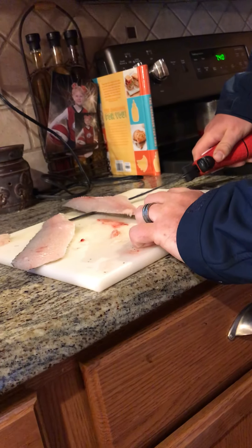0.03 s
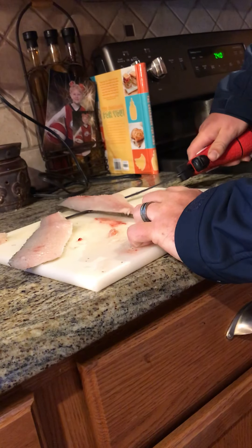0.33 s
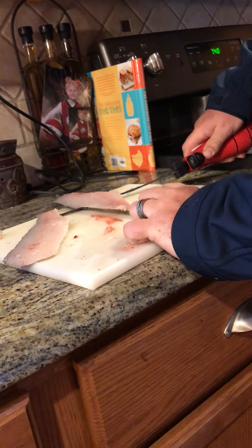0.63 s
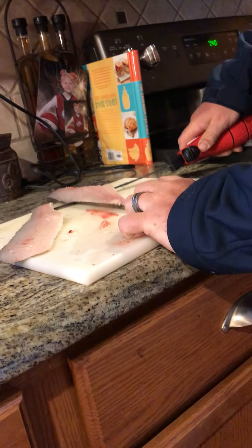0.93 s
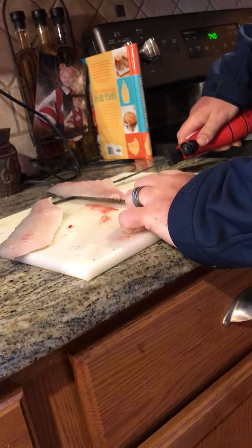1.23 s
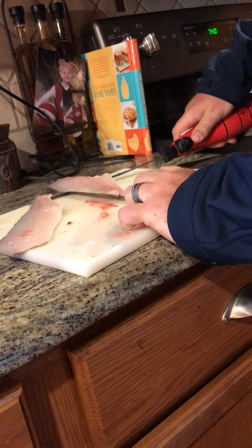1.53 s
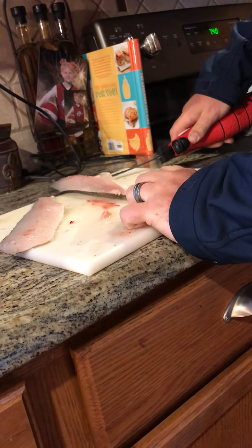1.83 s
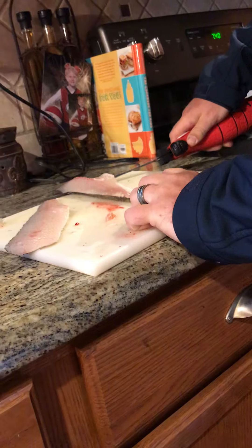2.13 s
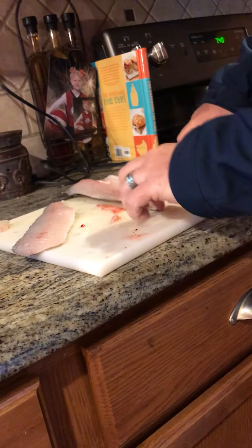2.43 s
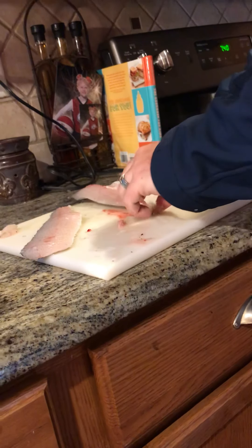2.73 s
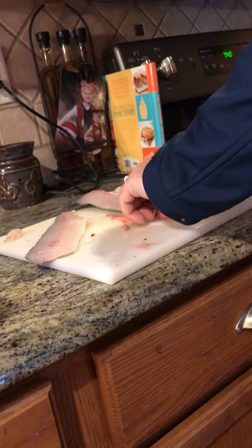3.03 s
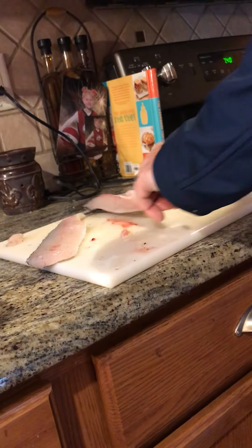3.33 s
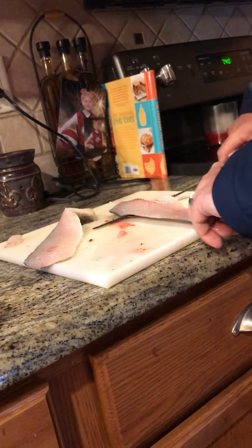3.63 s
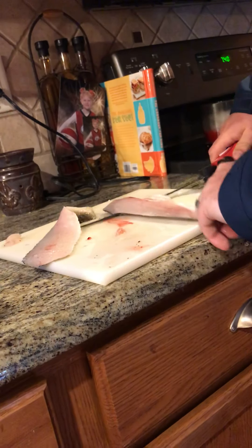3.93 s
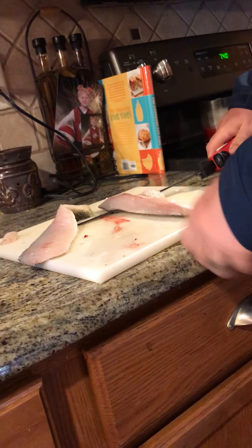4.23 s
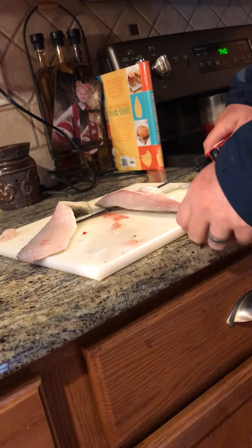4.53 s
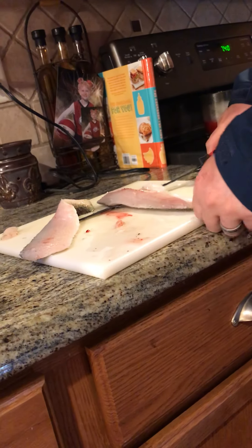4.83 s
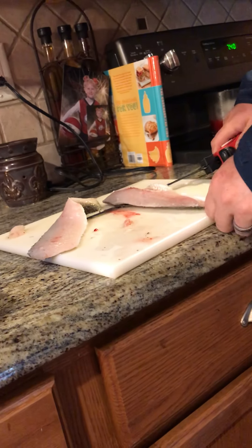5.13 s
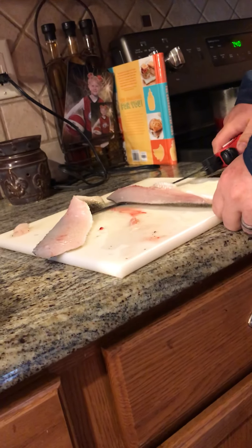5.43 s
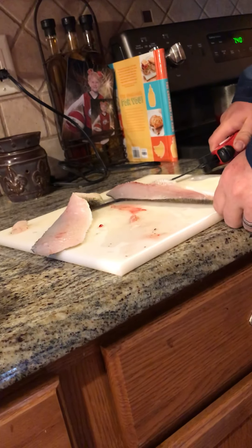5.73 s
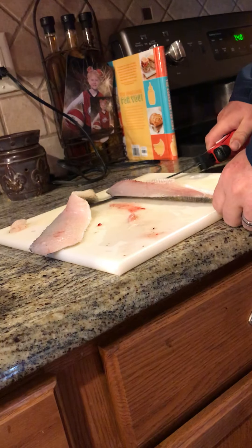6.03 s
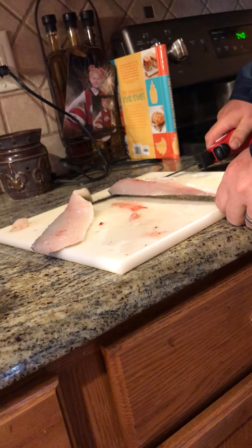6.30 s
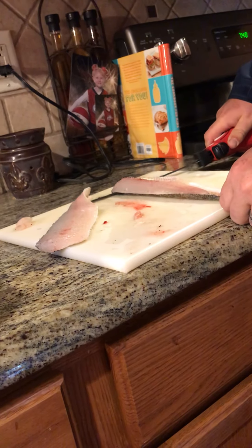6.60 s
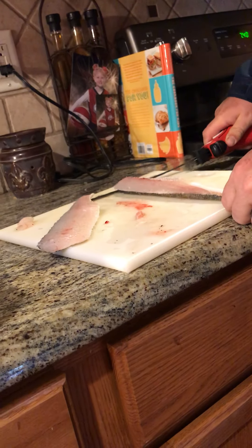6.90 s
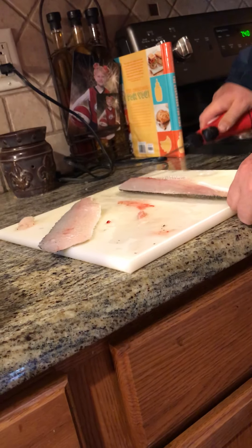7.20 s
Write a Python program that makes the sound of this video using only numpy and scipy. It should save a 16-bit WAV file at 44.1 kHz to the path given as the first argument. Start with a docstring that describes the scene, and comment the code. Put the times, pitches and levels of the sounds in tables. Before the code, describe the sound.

An electric knife saws through fish on a cutting board with a fast, chattering buzz, then coasts down. In the lull a hand thuds softly on the board and a sleeve brushes past. The knife gives a short, clattering burst, slows again, then restarts for a longer cut with a thin whine. Its blades click sharply as it begins to wind down. It is heard close by in a small kitchen with a faint hum.

```python
"""An electric fillet knife saws through a fish on a board, coasts down twice and starts again.
Its rotor turns a crank through a gear: gears and blades chatter on both strokes, and unloaded
blades slap at reversal. The trigger is let go once more just before the end.
The wiping hand thuds on the board and a sleeve brushes past in the first pause.
A small kitchen with a mains hum surrounds it."""
import sys
import numpy as np
from scipy import signal
from scipy.fft import rfft, irfft
from scipy.io import wavfile
from scipy.ndimage import uniform_filter1d

SR = 44100
rng = np.random.default_rng(int(sys.argv[2]) if len(sys.argv) > 2 else 0)


def wav_record(signal):
    """Record a signal, one row per channel, as 16-bit PCM in the file named by sys.argv[1]."""
    frames = np.transpose(np.atleast_2d(signal))
    bounded = np.clip(frames, -1, 1)
    # unit amplitude maps onto the largest positive 16-bit level
    quanta = np.round(bounded * 32767).astype(np.int16)
    wavfile.write(sys.argv[1], SR, quanta)


N = 328986
TIME_S = np.arange(N) / SR
FREQ_HZ = np.fft.rfftfreq(4096, 1 / SR) + 1

# Each row: trigger pulled in seconds, let go in seconds, friction braking in Hz per second.
TRIGGER_PULLS = [(-1, 2.237, 17.27), (3.68, 4.235, 21.39), (5.17, 7.232, 14.8)]
# Crank speed held under power. Each row: time in seconds, speed in Hz.
DRIVE_SPEED = [(0, 31.49), (1.1, 31.91), (2.05, 32.05), (2.27, 33.27), (3.68, 29.77), (4.2, 33.1),
               (5.17, 27.88), (5.55, 32.37), (6.1, 32.0), (6.7, 32.16), (7.2, 33.3)]
# Free blades at full speed, one row per pull. Each row: gear, rasp, slap, rotor and tip levels in dB,
# share of the blades lying flat from 0 to 1, extra chatter at the start in dB.
RUN_LEVELS = [(-35.5, -34, -23, -50, -48, 0.09, 0), (-34, -34.5, -25, -48.5, -45, .92, -2),
              (-37, -34.5, -25, -50, -37, 0.2, 2.5)]
# Cuts through the fish. Each row: entry in seconds, start of exit in seconds, then gains in dB for
# gear at head, gear at tail, whine at head, whine at tail, tips.
FISH_CUTS = [(-.5, 2.12, -4.5, -1, 6, 5, -5), (5.22, 6.79, 0, -1.5, 7, 13.5, -26)]
# Blades bearing on the board, most as the last cut ends. Each row: time in seconds, level in dB.
BOARD_LOAD = [(0, -49), (6.7, -45), (6.88, -35.5), (7.08, -33.5), (7.25, -47), (7.46, -58)]
# Blades snagging on each other or on skin. Each row: start in seconds, level in dB.
SNAGS = [(3.276, -36), (7.012, -27), (7.044, -30), (7.059, -46), (7.089, -34), (7.134, -26)]
# Stroke drumming on the board. Each row: multiple of the crank speed, level in dB.
STROKE_HARMONICS = [(4, -63.5), (6, -72), (11, -61), (12, -62), (13, -62), (14, -70.5), (16, -58.5),
                    (18, -63), (26, -49.5), (27, -49), (28, -47.5), (29, -48.5), (30, -49.5), (32, -56),
                    (34, -54)]
# Kitchen air. Each row: frequency in Hz, relative spectral density in dB.
AIR_SPECTRUM = [(25, -15), (42, -1), (70, 9.5), (110, -1.5), (250, 1.5), (500, -3), (1000, -26),
                (2000, -57), (5000, -12), (16000, -19)]
# Hand on the board; dull knocks heard through the handle: late strokes of the coasting blades and the trigger.
# Each row: start in seconds, level in dB.
HAND_THUDS = [(2.503, -41)]
HANDLE_KNOCKS = [(3.347, -41.5), (3.436, -40), (3.659, -37), (5.122, -41)]
# Passing sleeve. Each row: time in seconds, weave rate in Hz, level in dB.
SLEEVE_SWEEP = [(3.45, 1300, -57), (3.478, 1408, -53), (3.49, 1458, -41.5), (3.51, 1533, -41.5),
                (3.545, 1540, -39), (3.57, 1440, -42), (3.6, 1320, -45), (3.64, 1270, -68)]

# Resonances. Each row: frequency in Hz, width in Hz, relative level in dB.
LOADED_KNIFE_MODES = [(497, 270, -10.5), (680, 100, -15), (803, 460, 0), (1077, 103, 3.5), (1456, 82, 2.5),
                      (1630, 110, 1), (1910, 390, -3.5), (2320, 250, 2), (2560, 190, 1.5), (2980, 350, 2),
                      (3710, 420, 0.5), (4230, 800, -0.5), (5270, 120, -1), (6350, 1430, -2.5),
                      (8640, 450, -4), (9700, 440, -7.5), (11600, 950, -13.5), (14200, 2500, -31)]
FREE_KNIFE_MODES = [(345, 320, -7), (610, 110, -11), (820, 250, 1.5), (1090, 130, 5), (1480, 87, -1),
                    (1690, 150, -2.5), (2404, 320, -3), (3220, 590, 6), (4120, 590, 5.5),
                    (6500, 1200, -2.5), (8400, 500, -2), (11500, 3700, -23.5)]
CUTTING_BOARD_MODES = [(650, 37, -2.5), (868, 107, 0), (1030, 74, -19)]
LIFTED_BLADE_MODES = [(1000, 220, 2), (2590, 100, 5.5), (3505, 250, 7.5), (4440, 520, -3), (5390, 95, 7.5),
                      (6070, 270, 0.5), (6910, 420, 3), (8300, 350, 0.5), (9050, 1200, -11),
                      (10660, 360, -3), (11900, 350, -5), (13000, 400, -2), (14500, 1800, -29)]
FLAT_BLADE_MODES = [(1470, 300, 3), (3580, 300, 2.5), (5950, 230, 5.5), (6920, 240, 0), (8100, 48, 12),
                    (8700, 250, -8), (9410, 460, 4.5), (11000, 240, -2), (12100, 400, -19),
                    (13100, 800, -7), (15300, 1400, -15)]
DAMPED_BLADE_MODES = [(3140, 410, 7), (4130, 760, 3.5), (6160, 1400, 1), (8850, 2300, -2),
                      (12600, 2300, -9)]
BLADE_TIP_MODES = [(13100, 310, 0)]
HANDLE_MODES = [(745, 150, -1), (1040, 170, 0.5), (2600, 500, -16), (3800, 1700, -13), (9000, 11000, -23)]


def undb(db):
    """Decibels to gain."""
    return 10 ** (np.asarray(db) / 20)


def unit(x):
    """Scale to rms 1."""
    return x / np.sqrt(np.mean(x ** 2))


def curve(rows, column=1):
    """One table column, interpolated over time."""
    rows = np.asarray(rows, float)
    return np.interp(TIME_S, rows[:, 0], rows[:, column])


def ramp(start_s, length_s):
    """Linear rise from 0 to 1."""
    return np.clip((TIME_S - start_s) / length_s, 0, 1)


def walk(rate_hz):
    """Random drift, rms 1."""
    levels = rng.standard_normal(int(TIME_S[-1] * rate_hz) + 2)
    return unit(np.interp(TIME_S * rate_hz, np.arange(len(levels)), levels))


def grit(spread_db):
    """Dense tiny impacts of uneven size."""
    return unit(rng.standard_normal(N) * undb(spread_db * rng.standard_normal(N)))


def body(modes, low_hz=0, high_hz=np.inf):
    """Gain of a set of resonances, scaled so unit white noise has rms 1 in the band."""
    power = sum(undb(db) ** 2 / (1 + ((FREQ_HZ ** 2 - hz ** 2) / (FREQ_HZ * width_hz)) ** 2)
                for hz, width_hz, db in modes)
    return np.sqrt(power / np.mean(power * (FREQ_HZ > low_hz) * (FREQ_HZ < high_hz)))


def ring(x, gain):
    """Minimum-phase filter with this gain over FREQ_HZ."""
    cepstrum = irfft(np.log(gain + 1e-9))
    half = len(cepstrum) // 2
    cepstrum[1:half] *= 2
    cepstrum[half + 1:] = 0
    return signal.oaconvolve(x, irfft(np.exp(rfft(cepstrum))))[:N]


def clicks(times_s, sizes):
    """Impulses at the given times."""
    return np.bincount(np.clip(times_s * SR, 0, N).astype(int).ravel(), sizes.ravel(), N + 1)[:N]


def blows(rows, decay_s):
    """A sudden, decaying envelope per row."""
    times_s, db = np.transpose(rows)
    return signal.oaconvolve(clicks(times_s, undb(db)), np.exp(-TIME_S[:SR // 10] / decay_s))[:N]


def lobe(turns, centre_turns, width_turns):
    """One smooth swell per crank turn."""
    return np.exp((np.cos(2 * np.pi * (turns - centre_turns)) - 1) / (2 * np.pi * width_turns) ** 2)


def crank(spin_up_s=0.025, drag_per_s=0.25):
    """Crank speed: the motor spins up, then coasts against drag and friction when let go."""
    speed_hz = np.zeros(N)
    for pulled_s, let_go_s, braking_hz_per_s in TRIGGER_PULLS:
        coast_s = np.maximum(TIME_S - let_go_s, 0)
        spin_up = 1 - np.exp(-np.maximum(TIME_S - pulled_s, 0) / spin_up_s)
        driven_hz = np.interp(TIME_S - coast_s, TIME_S, curve(DRIVE_SPEED)) * spin_up
        run_hz = driven_hz * np.exp(-drag_per_s * coast_s) - braking_hz_per_s * coast_s
        speed_hz = np.maximum(speed_hz, run_hz)
    return speed_hz


def flesh(enter_s=0.37, leave_s=0.21):
    """Blade depth in the fish from 0 to 1, and the dB it adds to gear, whine and tips."""
    total = 0
    for entry_s, exit_s, *ends_db, tips_db in FISH_CUTS:
        depth = ramp(entry_s, enter_s) * (1 - ramp(exit_s, leave_s))
        gear_db = np.interp(TIME_S, [entry_s, exit_s], ends_db[:2])
        whine_db = np.interp(TIME_S, [entry_s, exit_s], ends_db[2:])
        total += np.array([depth, depth * gear_db, depth * whine_db, depth * tips_db])
    return total


def efforts(speed_hz, full_hz=33, slap_from_hz=6.3, free_bite=0.65):
    """Blade load (bite), flat share and part gains from speed, trigger, fish and board."""
    pace = speed_hz / full_hz
    run = np.searchsorted([row[0] for row in TRIGGER_PULLS], TIME_S) - 1
    pulled_s, let_go_s, _ = np.array(TRIGGER_PULLS)[run].T
    gear_db, rasp_db, slap_db, rotor_db, tips_db, flat, start_db = np.array(RUN_LEVELS)[run].T
    settling_db = start_db * (1 - ramp(pulled_s, 0.4))
    jolt_db = 11 * np.exp(-(TIME_S - pulled_s) / 0.024)  # starting torque jerks the gears
    depth, cut_gear_db, cut_whine_db, cut_tips_db = flesh()
    damping = 1 - depth + depth * undb(-11.5)  # flesh damps the blades
    # Bearing on the board hardens the push and stifles whine and tips.
    pressing_db = np.maximum(curve(BOARD_LOAD) - BOARD_LOAD[1][1], 0)
    play = np.clip((speed_hz - slap_from_hz) / 1.9, 0, 1)
    play *= undb(-4 * (1 - ramp(let_go_s, 0.29)))  # the driving motor takes up some play
    return dict(
        bite=np.clip((free_bite + (1 - free_bite) * depth) * pace ** 2.3, 0, 1),
        gear=undb(gear_db + cut_gear_db + jolt_db + settling_db) * pace ** 0.93,
        rasp=undb(rasp_db - 0.5 * depth + settling_db) * pace ** 1.3 * ramp(pulled_s, 0.01),
        slap=undb(slap_db) * damping * play * pace ** 1.13 * ramp(pulled_s, 0.16),
        flat=np.clip(flat + (0.88 - flat) * depth, 0, 1),
        rotor=undb(rotor_db) * pace ** 4.3 * ramp(pulled_s, 0.16),
        crunch=undb(0.4 * pressing_db),
        whine=undb(-53.5 + cut_whine_db - 1.6 * pressing_db) * pace ** 2.5,
        tips=undb(tips_db + cut_tips_db - 0.7 * pressing_db) * pace ** 2 * ramp(pulled_s, 0.56) ** 2)


def contacts(turns, speed_hz, jitter_s=3e-5, scatter_db=4, wander_db=1.5, per_turn=240):
    """The same teeth and burrs touch every turn; the force wanders as the hand moves."""
    offsets = (np.arange(per_turn) + rng.random(per_turn)) / per_turn
    places = np.arange(np.floor(turns[0]), turns[-1])[:, None] + offsets
    wander = unit(uniform_filter1d(rng.standard_normal(places.shape), size=24, axis=0))
    signs = rng.choice([-1, 1], per_turn)
    sizes = signs * undb(wander_db * wander + scatter_db * rng.standard_normal(places.shape))
    times_s = np.interp(places, turns, TIME_S, left=np.inf, right=np.inf)
    times_s += jitter_s * rng.standard_normal(places.shape)
    return unit(clicks(times_s, sizes) / np.sqrt(speed_hz + 2))


def chatter(turns, speed_hz, effort, crossover_hz=2100):
    """Gears rattle the housing (lows), blades rasp on each other (highs), the board resonates."""
    bite, force = effort["bite"], undb(0.5 * walk(30))
    gear_beat = 0.51 + (0.28 + 0.41 * bite) * lobe(turns, -0.05, 0.12) + 0.5 * lobe(turns, 0.446, 0.057)
    rasp_beat = 0.45 + (0.21 + 0.45 * bite) * lobe(turns, -0.013, 0.1) + 0.53 * lobe(turns, 0.48, 0.11)
    lows = 1 / np.sqrt(1 + (FREQ_HZ / crossover_hz) ** 8)
    highs = np.sqrt(1 - lows ** 2)
    knife = 0
    # Loaded contacts repeat closely; free parts rattle more at random.
    for modes, share, looseness in ((LOADED_KNIFE_MODES, bite, 0.55), (FREE_KNIFE_MODES, 1 - bite, 0.9)):
        push = unit(contacts(turns, speed_hz) + looseness * grit(spread_db=3.5)) * np.sqrt(share) * force
        gears = ring(push * gear_beat * effort["gear"], body(modes, 500, 2000) * lows)
        rasp = ring(push * rasp_beat * effort["rasp"], body(modes, 2200, 4500) * highs)
        knife += undb(-1) * gears + undb(-1.17) * rasp
    board_push = grit(spread_db=-3.5) * gear_beat * bite * undb(curve(BOARD_LOAD))
    return knife + ring(board_push, body(CUTTING_BOARD_MODES))


def strokes(turns, at_turns, lead_s, burst_s, rebound, rebound_s, scatter_db=1.2):
    """Envelope, once a turn: short burst, weaker rebound, dying rattle."""
    times_s = np.interp(np.arange(0, np.floor(turns[-1])) + at_turns, turns, TIME_S) - lead_s
    age_s = TIME_S[:SR // 10]
    burst = np.exp(-(age_s / burst_s) ** 4)
    bounce = rebound * np.exp(-((age_s - rebound_s) / 0.0015) ** 2)
    rattle = 0.047 * np.exp(-age_s / 0.009)
    sizes = undb(scatter_db * rng.standard_normal(len(times_s)))
    return signal.oaconvolve(clicks(times_s, sizes), burst + bounce + rattle)[:N]


def blade_slaps(turns, effort):
    """Blades snag and take up their play: on the return when free, on the push when loaded."""
    returns = strokes(turns, 0.5, lead_s=0.0049, burst_s=0.007, rebound=0.52, rebound_s=0.0125)
    bursts = returns * effort["slap"] + blows(SNAGS, decay_s=0.0075)
    lifted = ring(bursts * grit(spread_db=4) * np.sqrt(1 - effort["flat"]), body(LIFTED_BLADE_MODES))
    flat = ring(bursts * grit(spread_db=4) * np.sqrt(effort["flat"]), body(FLAT_BLADE_MODES))
    # Flesh damps the steel, so the push is a dry, broad crunch.
    pushes = strokes(turns, 0, lead_s=0.0045, burst_s=0.0094, rebound=0.14, rebound_s=0.0115)
    crunch = ring(pushes * effort["bite"] ** 2 * grit(spread_db=2.5), body(DAMPED_BLADE_MODES))
    return undb(-2) * lifted + undb(-1.5) * flat + undb(-31.5) * effort["crunch"] * crunch


def blade_tips(turns, effort):
    """Wet steel slides on steel; the thin tips ring high, most on the return."""
    rub = grit(spread_db=5) * (0.3 + 1.7 * lobe(turns, 0.45, 0.073)) * effort["tips"]
    return ring(rub, body(BLADE_TIP_MODES))


def drive_tones(turns, effort, gear_ratio=25 / 3, whine_per_turn=72):
    """Rotor unbalance, gear whine and the stroke drumming on the board."""
    crank_rad = 2 * np.pi * turns
    rotor = np.sin(gear_ratio * crank_rad + 0.53 * walk(28)) * effort["rotor"] * undb(0.99 * walk(30))
    whine = np.sin(whine_per_turn * crank_rad + 0.5 * walk(25)) * effort["whine"] * undb(1.1 * walk(8))
    drumming = sum(np.cos(multiple * (crank_rad + 0.577) + 0.77 * walk(25)) * undb(db + 2 * walk(6))
                   for multiple, db in STROKE_HARMONICS)
    return np.sqrt(2) * (rotor + whine + effort["bite"] ** 2 * drumming)


def handle_shake(turns, effort):
    """Blades shake the handle twice a turn, beating slowly against the mains hum."""
    return undb(-61) * effort["bite"] * np.sin(4 * np.pi * turns)


def kitchen(air_db=-56, hum_db=-59, mains_hz=60):
    """Still air and the wavering mains hum of an appliance."""
    hz, db = np.transpose(AIR_SPECTRUM)
    air_gain = undb(np.interp(np.log(FREQ_HZ), np.log(hz), db))
    air = unit(ring(rng.standard_normal(N), air_gain))
    hum = np.sqrt(2) * np.sin(2 * np.pi * mains_hz * TIME_S)
    return undb(air_db + 0.15 * walk(2)) * air + undb(hum_db + 1.5 * walk(5)) * hum


def hand_thud(pitch_hz=120, width_hz=22):
    """The wiping hand lands on the board and rings one low, damped mode."""
    times_s, db = np.transpose(HAND_THUDS)
    age_s = TIME_S[:SR // 4]
    thump = np.sin(2 * np.pi * pitch_hz * age_s) * np.exp(-np.pi * width_hz * age_s)
    return signal.oaconvolve(clicks(times_s, undb(db)), thump)[:N]


def handle_knocks():
    """Late strokes of the coasting blades and the trigger knock dully in the handle."""
    return ring(blows(HANDLE_KNOCKS, decay_s=0.015) * rng.standard_normal(N), body(HANDLE_MODES))


def sleeve():
    """Woven cloth zips at a rate that follows the arm, over a wide hiss."""
    weave_rad = 2 * np.pi * np.cumsum(curve(SLEEVE_SWEEP)) / SR
    weave = unit(walk(480) * np.cos(weave_rad) + walk(480) * np.sin(weave_rad))
    cloth = body([(1060, 450, 2.5), (2120, 1900, -3), (6260, 2600, -3.5), (11900, 2100, -10)])
    hiss = ring(rng.standard_normal(N), cloth)
    passing = (TIME_S > SLEEVE_SWEEP[0][0]) & (TIME_S < SLEEVE_SWEEP[-1][0])
    return (weave + hiss) * undb(curve(SLEEVE_SWEEP, column=2) - 3) * passing


def room(x, wet_db=-7, t60_s=0.47, damping_hz=7000):
    """Counter, tiles and cupboards add a short, duller tail."""
    age_s = TIME_S[:SR // 2]
    tail = rng.standard_normal(len(age_s)) * np.exp(-np.log(1000) * age_s / t60_s) * (age_s > 0.003)
    wet = signal.oaconvolve(x, tail / np.linalg.norm(tail))[:N]
    return x + undb(wet_db) * ring(wet, 1 / np.sqrt(1 + (FREQ_HZ / damping_hz) ** 2))


def scene():
    """Mono mix of the crank-driven knife, handling noises and kitchen."""
    speed_hz = crank()
    turns = np.cumsum(speed_hz) / SR - 0.362
    effort = efforts(speed_hz)
    knife = chatter(turns, speed_hz, effort) + blade_slaps(turns, effort) + blade_tips(turns, effort)
    in_room = room(knife + hand_thud() + handle_knocks() + sleeve())
    tones = drive_tones(turns, effort) + handle_shake(turns, effort)
    return (undb(0.4) * in_room + tones + kitchen())[None, :]


def record(dry):
    """A steep low-pass cuts the top treble."""
    cutoff_hz = 15850
    return signal.sosfilt(signal.ellip(10, 0.2, 80, cutoff_hz, fs=SR, output="sos"), dry)


dry = scene()
out = record(dry)
wav_record(out)
```